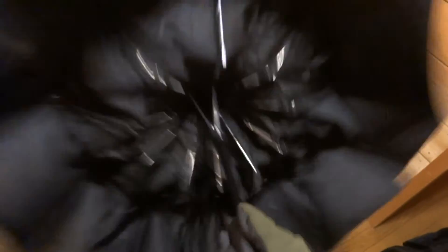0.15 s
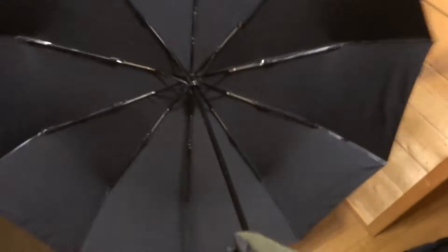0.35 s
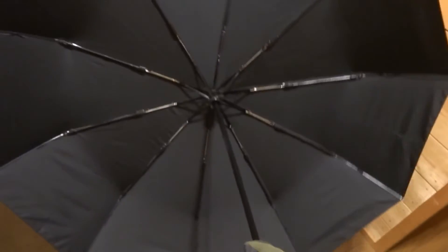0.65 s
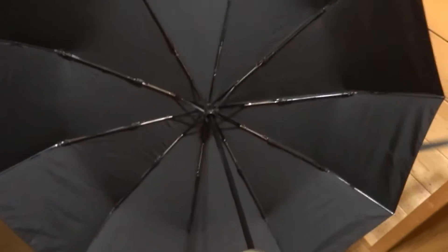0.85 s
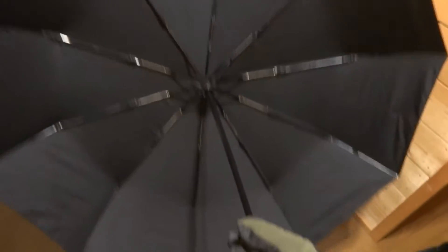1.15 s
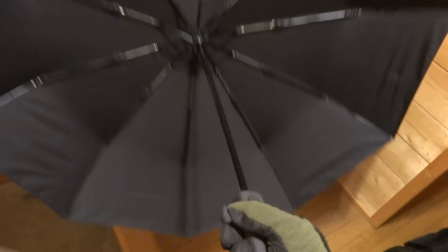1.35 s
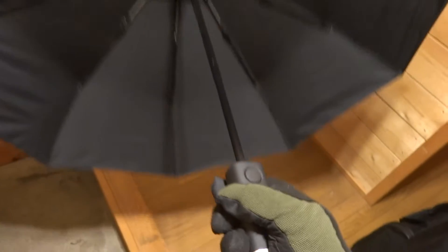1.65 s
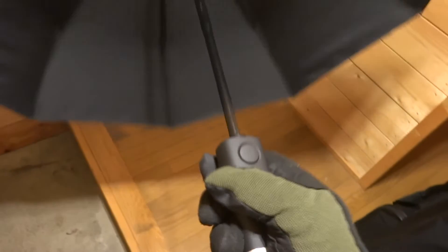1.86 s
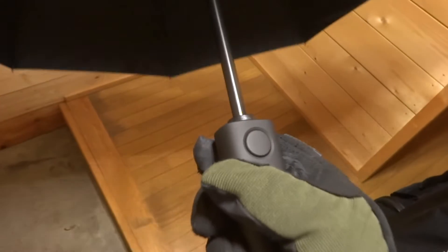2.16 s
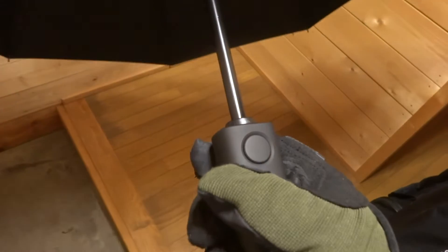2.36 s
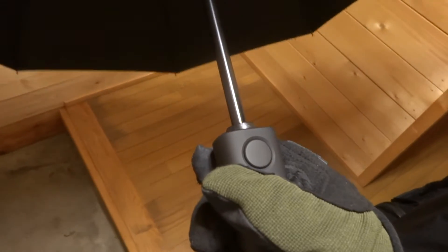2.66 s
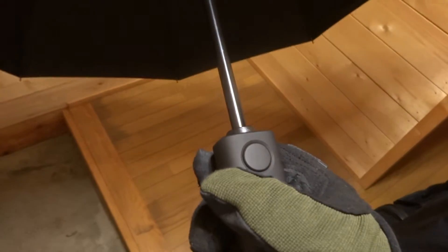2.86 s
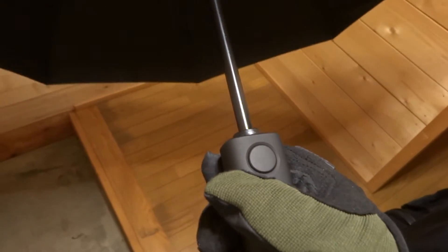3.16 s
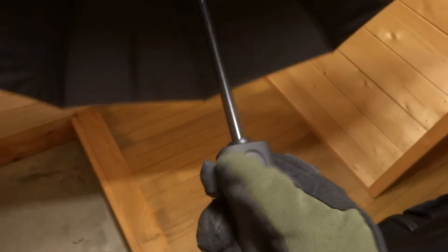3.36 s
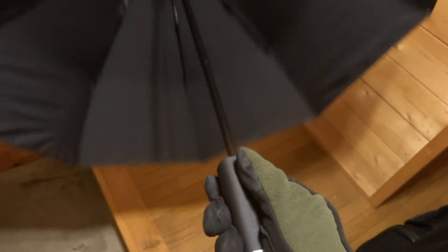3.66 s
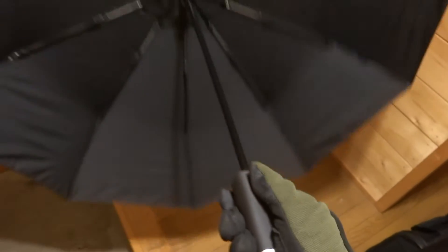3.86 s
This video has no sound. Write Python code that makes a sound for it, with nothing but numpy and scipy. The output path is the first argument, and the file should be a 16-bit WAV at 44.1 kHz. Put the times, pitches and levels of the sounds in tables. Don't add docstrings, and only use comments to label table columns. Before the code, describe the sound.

Close up in a wooden cabin, an umbrella whooshes and cracks open at once, its canopy thumping taut; afterwards come a soft click cluster, faint handle taps and light cloth rustle over quiet ventilation.

```python
import sys
import numpy as np
from scipy import signal
from scipy.fft import rfft, irfft
from scipy.io import wavfile

SR = 44100
rng = np.random.default_rng(int(sys.argv[2]) if len(sys.argv) > 2 else 0)


def decibels_to_gain(level_db):
    exponent = np.asarray(level_db, float) / 20
    return 10 ** exponent


def to_wav(s):
    ch = np.atleast_2d(s).T
    pcm = np.round(np.clip(ch, -1, 1) * 32767)
    wavfile.write(sys.argv[1], SR, pcm.astype(np.int16))


N = 176400


def rms_one(x):
    return x / np.sqrt(np.mean(x ** 2) + 1e-20)


def in_time(rows):
    s, db = np.transpose(rows)
    return np.interp(np.arange(N) / SR, s, db, left=-140, right=-140)


def at_hz(points, hz):
    points_hz, points_db = np.transpose(points)
    return np.interp(np.log(hz), np.log(points_hz), points_db)


def colour(x, spectrum):
    size = 8192
    hz = np.maximum(np.arange(size // 2 + 1) * SR / size, 10)
    below, above = (5, spectrum[0][1] - 30), (23000, spectrum[-1][1] - 20)
    db = at_hz([below] + list(spectrum) + [above], hz)
    cepstrum = irfft(np.log(decibels_to_gain(db)))
    cepstrum[1:size // 2] *= 2
    cepstrum[size // 2 + 1:] = 0
    impulse = irfft(np.exp(rfft(cepstrum)))
    return rms_one(signal.fftconvolve(np.atleast_2d(x), impulse[None], axes=1)[:, :N])


def drift(rate_hz):
    r = np.exp(-80 * np.pi * rate_hz / SR)
    white = rng.standard_normal(N // 40 + 2002)
    slow = signal.lfilter([1], [1, -2 * r, r * r], white)[2000:]
    return np.interp(np.arange(N) / 40, np.arange(len(slow)), rms_one(slow))


def grains(per_s, spread_db):
    sizes = decibels_to_gain(spread_db * np.minimum(rng.exponential(1, N), 4))
    signs = rng.choice([-1, 1], N)
    return sizes * signs * (rng.random(N) < per_s / SR)


def resonance(x, hz, width_hz):
    r = np.exp(-np.pi * width_hz / SR)
    zeros = np.array([1, 0, -1]) * (1 - r * r) / 2
    poles = [1, -2 * r * np.cos(2 * np.pi * hz / SR), r * r]
    return signal.lfilter(zeros, poles, x + 1e-18)


def slide():
    # t/s, level/dB
    opening = [(0, -31.5), (.03, -39.5), (.06, -37.5), (.125, -35), (.17, -31), (.2, -35.5), (.262, -39),
               (.28, -32), (.315, -35.5), (.345, -24.5), (.36, -31.5), (.38, -40.5), (.4, -40.5),
               (.425, -46), (.445, -44), (.46, -50), (.5, -81), (.53, -75.5)]
    # t/s, level/dB
    sway = [(2.76, -95), (2.8, -73), (2.85, -72), (2.89, -90), (3.09, -90), (3.13, -75), (3.2, -75),
            (3.25, -88), (3.32, -74), (3.45, -74), (3.5, -76), (3.55, -72), (3.62, -73), (3.66, -84),
            (3.8, -95)]
    # f/Hz, density/dB
    scrape_colour = [(180, -39.5), (300, -11), (761, -14.5), (834, -6.5), (1200, -3.5), (4470, 3.5),
                     (8480, 6.5), (10800, 3.5), (11500, -40), (15000, -64.5), (22000, -120)]
    scrape = colour(grains(4900, spread_db=2.5), scrape_colour)[0]
    opening_level = decibels_to_gain(in_time(opening) + drift(43))
    sway_level = decibels_to_gain(in_time(sway) + 0.76 * drift(6.6))
    return (opening_level + sway_level) * scrape


def snaps():
    # t/s, peak/dB, ring f/Hz, length/s, body level/dB
    joints = [(.001, -19, 8600, .004, -14), (.016, -24, 8500, .008, -20), (.135, -19, 7500, .007, -25),
              (.1532, -14.5, 8800, .0018, -14), (.1545, -17, 8600, .002, -16), (.161, -20, 9000, .003, -14),
              (.163, -11.5, 8000, .0014, -5), (.1643, -14, 7300, .003, -8), (.1669, -21, 8500, .0018, -14),
              (.332, -12, 10000, .0015, -16), (.3354, -13, 5000, .0012, 4), (.3368, -16, 9500, .0015, -4),
              (.3375, -9.5, 6400, .0022, -16), (.3396, -19, 8800, .0015, -20), (.4368, -16, 6800, .001, -4),
              (.4372, -22, 3600, .0018, -6)]
    ring_width_hz, body_above_hz = 2400, 1500
    out, t = np.zeros(N + 2000), np.arange(2000) / SR
    body_filter = signal.butter(1, body_above_hz, "high", fs=SR, output="sos")
    chatter = rng.standard_normal((len(joints), len(t)))
    for (s, db, hz, length, body_db), noise in zip(joints, chatter):
        swell = np.sin(np.pi * np.minimum(t / length, 1) ** .7) ** 2
        burst = np.sign(noise) * swell
        ring = resonance(resonance(burst, hz, ring_width_hz), hz, ring_width_hz)
        snap = ring + decibels_to_gain(body_db - 6.5) * signal.sosfilt(body_filter, burst)
        i = int(s * SR)
        out[i:i + len(t)] += decibels_to_gain(db) * snap / np.abs(snap).max()
    return out[:N] * decibels_to_gain([[.8], [-.8]])


def drum(push):
    # f/Hz, level/dB, t60/s
    modes = [(108.6, -7.5, 0.069), (140, -1.5, 0.08), (188, -3, 0.12), (248, -6, .06), (331.5, 0, .08),
             (445, -2.5, 0.17), (609, -6.5, .05), (744, 6, 0.019), (920, 5, 0.04), (1105, 2, 0.042),
             (1480, 0, 0.026)]
    out = 0
    for k, (hz, db, t60) in enumerate(modes):
        width_hz = np.log(1000) / np.pi / t60
        mode = resonance(push, hz, width_hz) / np.sqrt(1 / t60)
        out = out + (-1) ** k * decibels_to_gain(db) * mode
    return out


def canopy():
    # t/s, level/dB
    billow = [(0, -56), (.14, -60), (.2, -44.5), (.26, -39.5), (.3, -35.5), (.33, -36.5), (.36, -37.5),
              (.39, -40.5), (.41, -47), (.44, -46.5), (.47, -54.5), (.52, -91.5)]
    # f/Hz, density/dB
    nylon = [(18, -44.5), (30, -12), (138, -20.5), (263, -7), (329, -6), (668, -9.5), (1360, -9),
             (2470, -11.5), (6000, -14), (7800, -37), (13200, -120)]
    air_db = in_time(billow)
    crackle_db = -35.5 + 0.4 * (air_db + 34.5) + 2.1 * drift(40)
    crackle = decibels_to_gain(crackle_db) * colour(grains(2500, spread_db=3.5), nylon)[0]
    flaps = signal.lfilter([1], [1, -.9], grains(810, spread_db=0.0))
    flapping = drum(decibels_to_gain(air_db) * flaps) / np.std(drum(flaps))
    gust = rms_one(resonance(rng.standard_normal(N), hz=45, width_hz=17))
    return crackle * (air_db > -99) + flapping + decibels_to_gain(air_db - 20.5) * gust


def booms():
    # t/s, length/s, start f/Hz, level/dB
    panels = [(.145, 0.044, 175.5, -44.5), (.225, 0.035, 320, -39), (.28, .045, 330, -35.5),
              (.313, .04, 125, -32.5), (.335, .035, 175, -35), (.34, .075, 298, -35),
              (.355, 0.055, 132, -32.5), (.375, .03, 430, -36.5), (.405, 0.043, 145, -36),
              (.61, .06, 110, -62.5), (1.232, .028, 159.6, -51), (1.235, .03, 454.4, -49.5),
              (1.285, .025, 179.7, -54.5), (1.308, .03, 150.6, -58.5), (1.345, .025, 202, -65),
              (1.368, 0.0242, 135, -61.5)]
    tighten_per_s = 1.9
    out, t = np.zeros(N), np.arange(N) / SR
    for (s, length, hz, db), start_turn in zip(panels, rng.random(len(panels))):
        u = np.clip(t - s, 0, length)
        swell = np.abs(np.sin(np.pi * u / length)) ** 1.5
        turns = start_turn + hz * u * (1 + tighten_per_s * u / 2)
        out += decibels_to_gain(db) * swell * np.sin(2 * np.pi * turns)
    return out


def bumps():
    # t/s, peak/dB, contact/s, canopy ring level/dB, direction/sign
    knocks = [(0.2026, -26, .0012, -1, 1), (0.268, -25.5, .0012, 7, 1), (.372, -26.5, 0.0021, 10, -1),
              (0.385, -25, 0.0024, 3, -1), (0.397, -24, .002, 6, 1), (0.638, -55, 0.00111, 6.5, 1),
              (.77, -61.5, 0.0043, 2, 1), (.856, -49.5, 0.0034, -6.5, -1), (1.071, -57.5, 0.004, 4.5, 1),
              (1.103, -52.5, 0.0045, 4, -1), (1.2304, -45, 0.001, 11, -1), (1.239, -40.5, .001, 16.5, 1),
              (1.242, -36.5, 0.00062, 9, 1), (1.2525, -37.5, 0.0013, 8.5, 1),
              (1.274, -46.5, 0.0022, 10.5, -1), (1.418, -61.5, .009, -4, 1), (1.587, -52, .004, 1.5, -1),
              (1.659, -66.5, 0.0043, 1, 1), (1.695, -62.5, 0.0057, 0, 1), (1.84, -60, 0.0027, 13, 1),
              (1.864, -54, .004, 5.5, 1), (1.872, -54.5, .004, 1, 1), (1.881, -49, .003, 6.5, 1),
              (1.887, -54, 0.0017, 7, 1)]
    push, ring, t = np.zeros(N), np.zeros(N), np.arange(N) / SR
    for s, db, contact, ring_db, direction in knocks:
        u = np.clip((t - s) / contact, 0, 2)
        push_pull = np.sin(2 * np.pi * (u / 2) ** .6) * np.exp(-.2 * u)
        pulse = np.sign(direction) * decibels_to_gain(db) * push_pull
        push += pulse
        ring += decibels_to_gain(ring_db) * pulse
    rumble_cut = signal.butter(2, 78, "high", fs=SR, output="sos")
    return signal.sosfilt(rumble_cut, [push, drum(ring)])


def ticks():
    # t/s, peak/dB, shiver level/dB, low body level/dB
    tips = [(.6285, -51, -39.5, -6), (1.2296, -48.5, -46, 5), (1.271, -43, -51.5, -7.5),
            (1.8336, -51.5, -59.5, -2.5), (1.8365, -54, -59.5, -15), (1.844, -52, -56, -12.5),
            (1.8474, -49.5, -57, -19.5), (1.8597, -48.5, -63.5, -9.5), (3.584, -56, -77, -19),
            (3.591, -57, -73, -19.5), (3.6247, -51, -66, 4.5), (3.627, -51, -67, 2),
            (3.685, -58.5, -80, -20), (3.6946, -48, -73, -20), (3.6975, -51, -68, -21),
            (3.716, -64, -80, -16)]
    tick_s, shiver_rise_s, shiver_s = .0012, .0015, .025
    out, t = np.zeros(N + SR), np.arange(SR // 4) / SR
    chatter = rng.standard_normal((len(tips), len(t)))
    for (s, db, shiver_db, body_db), noise in zip(tips, chatter):
        tick = decibels_to_gain(db + 5) * np.exp(-t / tick_s)
        shiver = decibels_to_gain(shiver_db) * np.minimum(t / shiver_rise_s, 1) * np.exp(-t / shiver_s)
        burst = noise * np.minimum(t / 0.000223, 1) * (tick + shiver)
        bright = resonance(burst, hz=7100, width_hz=3200)
        body = decibels_to_gain(body_db - 2.5) * resonance(burst, hz=2096, width_hz=4000)
        i = int(s * SR)
        out[i:i + len(t)] += bright + body
    return out[:N]


def cabin(x):
    t60_s, treble_t60_s, spread = .34, .28, .72
    t = np.arange(int(.6 * SR)) / SR
    white = rng.standard_normal((2, len(t)))
    low = signal.sosfilt(signal.butter(1, 4000, fs=SR, output="sos"), white)
    tail = low * decibels_to_gain(-60 * t / t60_s) + (white - low) * decibels_to_gain(-60 * t / treble_t60_s)
    tail *= np.clip((t - .004) / .006, 0, 1)
    tail /= np.sqrt(np.sum(tail[0] ** 2))
    mid, side = signal.fftconvolve(x[None], tail, axes=1)[:, :N]
    side = signal.sosfilt(signal.butter(2, 520, "high", fs=SR, output="sos"), side)
    return mid + spread * side * np.array([[1], [-1]])


def hush():
    # f/Hz, density/dB
    air_colour = [(25, -14.5), (80, -11), (140, -10.5), (300, -7.5), (800, -6), (1400, -11), (3530, -15),
                  (5500, -24), (11000, -24.5)]
    # f/Hz, width/Hz, level/dB
    duct_modes = [(334, 40, 0), (619, 45, 0), (1070, 110, 0), (1570, 61, -3), (2000, 80, -4),
                  (2750, 100, -8), (3480, 180, -5), (3780, 80, -7)]
    # f/Hz, correlation/1
    likeness = [(60, 0.49), (220, 0.83), (840, 0.41), (3130, 0.65), (11000, 0.77)]
    white = rng.standard_normal((4, N))
    air = decibels_to_gain(-67.5 - 1.5) * colour(white[:2], air_colour)
    duct = sum(decibels_to_gain(db) * resonance(white[2:], hz, width) for hz, width, db in duct_modes)
    mid, side = air + decibels_to_gain(-70.5) * rms_one(duct)
    hz = np.maximum(np.arange(N // 2 + 1) * SR / N, 10)
    alike = np.clip(at_hz(likeness, hz), 0, 1)
    mid = irfft(rfft(mid) * np.sqrt((1 + alike) / 2), N)
    side = irfft(rfft(side) * np.sqrt((1 - alike) / 2), N)
    return mid + side * np.array([[1], [-1]])


def scene():
    push, ring = bumps()
    near = slide() * decibels_to_gain([[.4], [-.4]]) + canopy() * decibels_to_gain([[-.9], [.9]])
    near = near + snaps() + ticks() + ring + booms()
    reflections = cabin(near.mean(axis=0) + decibels_to_gain(-2.0) * push)
    return near + push + decibels_to_gain(-8) * reflections + hush()


def roll_off(x):
    return signal.sosfilt(signal.butter(12, 12290, fs=SR, output="sos"), x)


def record(dry):
    # f/Hz, level/dB
    housing = [(30, 2), (100, 2), (3000, -2.5), (3700, -1), (4800, -5), (6400, 1.5), (9000, -0.5),
               (11000, -5)]
    coloured = colour(dry, housing) * np.sqrt(np.mean(dry ** 2))
    top_cut = signal.cheby2(12, 30, 11050 * 1.04, fs=SR, output="sos")
    mix = signal.sosfilt(top_cut, coloured)
    return roll_off(mix)


dry = scene()
out = record(dry)
to_wav(out)
```